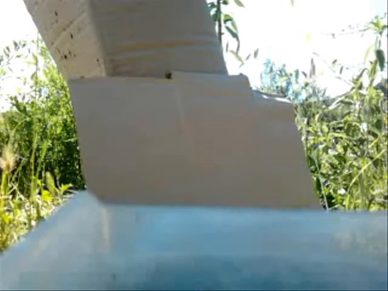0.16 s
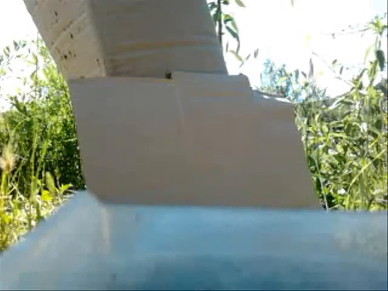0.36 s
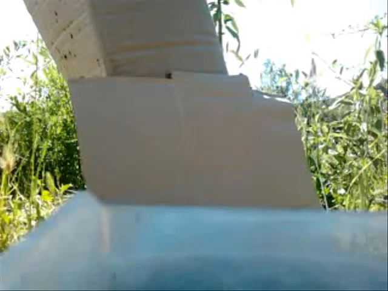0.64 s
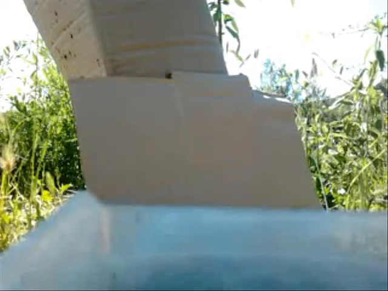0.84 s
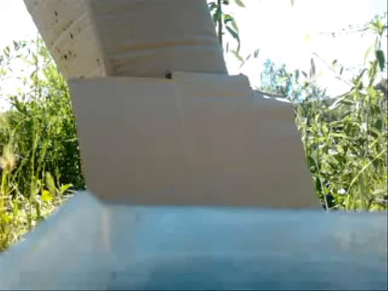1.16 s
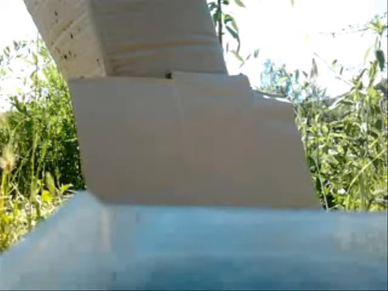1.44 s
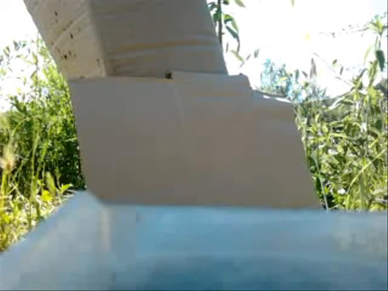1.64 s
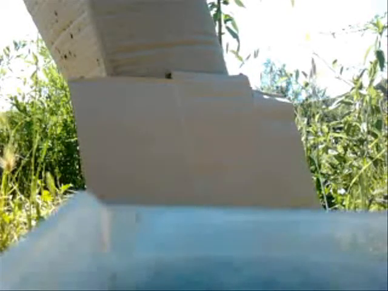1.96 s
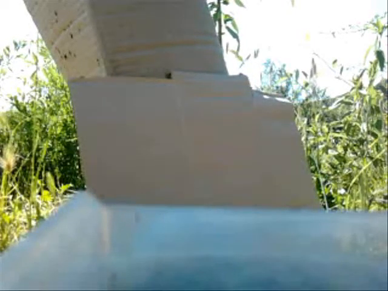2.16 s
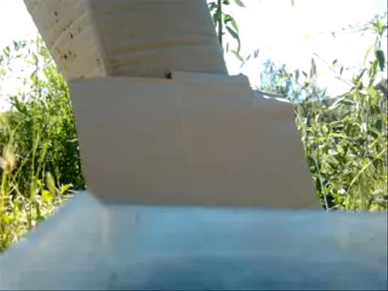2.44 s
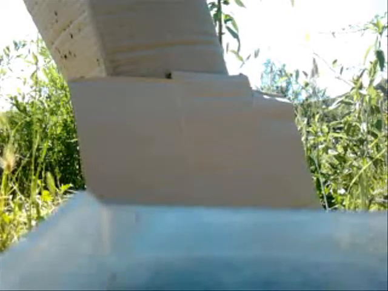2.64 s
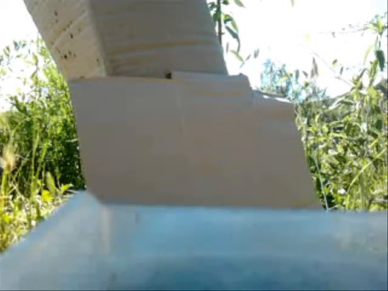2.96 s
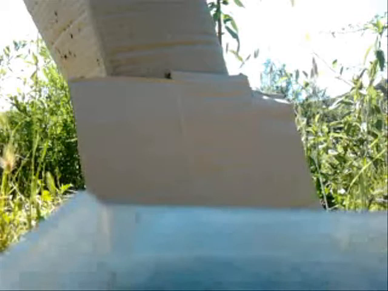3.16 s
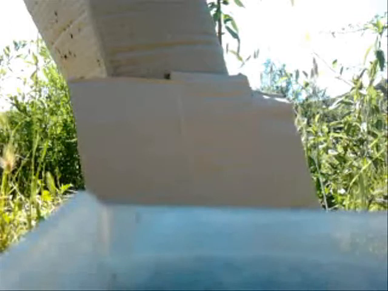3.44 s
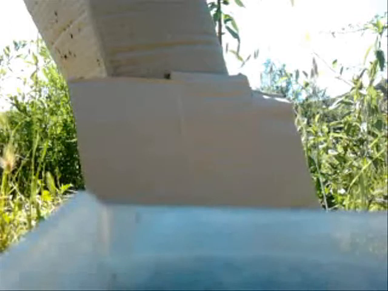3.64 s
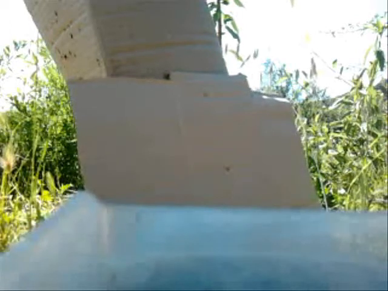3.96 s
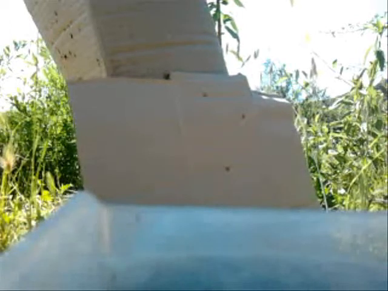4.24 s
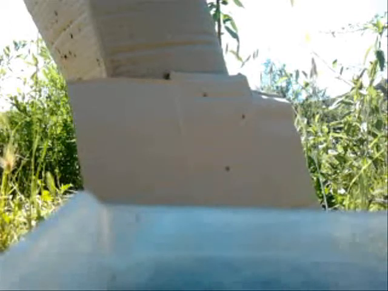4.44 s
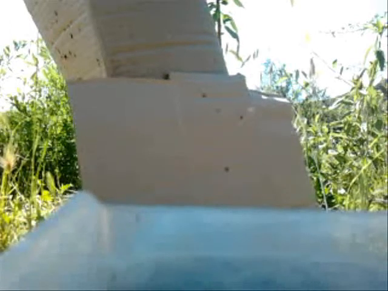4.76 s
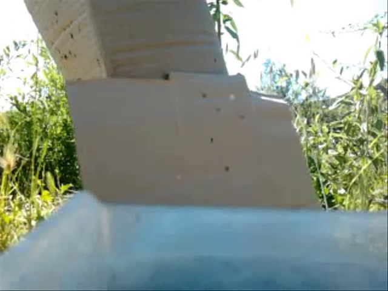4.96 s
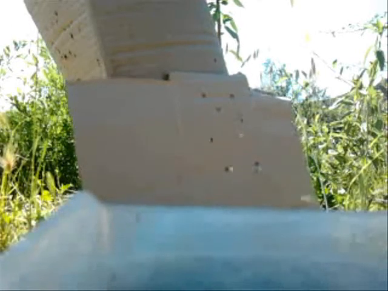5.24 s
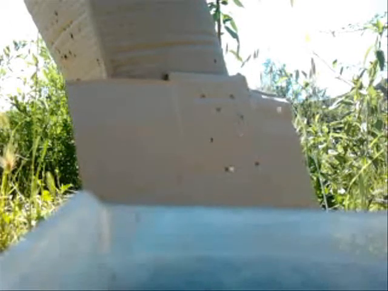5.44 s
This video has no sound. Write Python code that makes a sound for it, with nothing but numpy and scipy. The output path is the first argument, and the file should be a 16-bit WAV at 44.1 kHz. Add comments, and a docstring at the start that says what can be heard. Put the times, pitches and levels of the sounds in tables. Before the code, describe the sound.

Close microphone beside a cardboard target on a wooden stand, outdoors among plants. Small birds chirp for two seconds, then faint distant automatic pops begin. About a quarter second after most pops comes a loud, dry, woody crack. Single impacts turn into clusters, then a dense volley to the end, with glancing ticks, pattering pellets and short scattered echoes. Treble is muffled, and the loudest hits distort.

```python
"""Quiet open air, with a cardboard target on a wooden stand right beside the microphone; small birds chirp first.
Far off, an airsoft rifle fires short automatic bursts: faint pops of noise. Most are followed about a
quarter second later by the loud knock of a pellet, made of noise cracks and the ringing modes of the target;
the last knocks have no pop of their own. Bright ticks, mostly glancing pellets, and a soft patter surround
the knocks; a stray slaps a far panel. The recorder is dull above the mid treble and overloads on the knocks."""
import sys
import numpy as np
from scipy import signal
from scipy.io import wavfile
from scipy.ndimage import uniform_filter1d

SR = 44100
rng = np.random.default_rng(int(sys.argv[2]) if len(sys.argv) > 2 else 0)


def file_out(sig):
    """Save sig as 16-bit WAV at sys.argv[1]."""
    # one column per channel
    cols = np.atleast_2d(sig).T
    # limit, then scale
    lim = np.clip(cols, -1, 1)
    pcm = np.round(lim * 32767).astype(np.int16)
    wavfile.write(sys.argv[1], SR, pcm)


N = 246959  # samples, 5.6 s


def gain_of(db):
    """Decibels to amplitude."""
    return 10 ** (np.asarray(db) / 20)


def evened(x):
    """Scales to unit rms."""
    return x / np.sqrt(np.mean(x ** 2) + 1e-20)


def burst(x):
    """Scales a short sound to the energy of 10 ms at unit rms."""
    return x / np.sqrt(np.sum(x ** 2) / (SR / 100))


def read(points, hz):
    """Joins (Hz, value) points by straight lines on a log-frequency axis."""
    f, value = np.transpose(points)
    return np.interp(np.log(hz + 1), np.log(f + 1), value)


def add(mix, start_s, sound):
    """Mixes a sound in from a given time, cut off at the end of the mix."""
    part = mix[max(round(start_s * SR), 0):][:len(sound)]
    part += sound[:len(part)]


def noise(points, size, peak_hz=1000, peak_db=0, octaves=0.31):
    """Unit-rms noise of a given (Hz, dB) spectrum, with one optional resonance."""
    hz = np.fft.rfftfreq(size, 1 / SR)
    resonance_db = peak_db * np.exp(-(np.log2((hz + 1) / peak_hz) / octaves) ** 2)
    phases = np.exp(2j * np.pi * rng.random(len(hz)))
    return evened(np.fft.irfft(gain_of(read(points, hz) + resonance_db) * phases, size))


def blow(t, rise, t60):
    """An envelope that swells smoothly and then dies away, 60 dB in t60 seconds; top 1."""
    shape = (1 - np.exp(-(t / rise) ** 2)) * np.exp(-np.log(1000) * t / t60)
    return shape / shape.max(-1, keepdims=True)


def crackle(size, depth_db=4):
    """A grainy gain whose clumps are a millisecond or two long."""
    return gain_of(depth_db * evened(uniform_filter1d(rng.standard_normal(size), size=64)))


def tail(points, t60s):
    """One second of noise in which every band dies at its own speed; unit energy."""
    hz, t, bands = signal.stft(noise(points, SR), SR, nperseg=256)
    decay = np.exp(-np.log(1000) * t / read(t60s, hz)[:, None])
    x = signal.istft(bands * decay, SR, nperseg=256)[1][:SR]
    return x / np.linalg.norm(x)


# Spectrum of the open air. Each row: frequency in Hz, level in dB.
AIR_SPECTRUM = [(15, -43.5), (25, -23.5), (149, -15), (180, -4), (255, -2.5), (393, -5.5), (418, -6.5),
                (454, -5.5), (758, -9), (823, -9.5), (1030, -10.5), (2120, -15.5), (3400, -14), (4420, -44),
                (7480, -120)]


def air(murmur_db=-58, hiss_db=-68):
    """Steady outdoor murmur and a faint hiss of leaves, both shaped noise."""
    murmur = gain_of(murmur_db) * noise(AIR_SPECTRUM, N)
    hiss = gain_of(hiss_db) * noise([(1500, -31), (3400, 3.5), (4800, 4.0), (6500, -7.5)], N)
    return murmur + hiss


# Bird chirps. Each row: start in seconds, length in seconds, top pitch in Hz, level in dB.
CHIRP_CALLS = [(0.11, 0.09, 3480, -55), (0.641, 0.084, 3490, -48.5), (0.849, 0.053, 3240, -47),
               (1.072, 0.097, 3380, -49), (1.235, 0.038, 3600, -54), (1.279, 0.055, 3500, -55.5),
               (1.392, 0.052, 3550, -54.5), (1.515, 0.071, 3510, -53), (1.62, 0.062, 3460, -52.5),
               (2.074, 0.038, 3250, -44.5)]


def birds(climb_s=0.0224, climb_hz_per_s=13050, sag_hz_per_s=12000, quaver_hz=112):
    """Quavering whistles that climb to a top pitch, then sag: short ones arch, long ones fall away."""
    out = np.zeros(N)
    for start_s, length_s, top_hz, db in CHIRP_CALLS:
        size = int(length_s * SR)
        past_top = np.arange(size) / SR - climb_s
        glide = top_hz + np.minimum(climb_hz_per_s * past_top, -sag_hz_per_s * past_top)
        quaver = quaver_hz * evened(uniform_filter1d(rng.standard_normal(SR), size=150))[:size]
        whistle = np.sin(2 * np.pi * np.cumsum(glide + quaver) / SR)
        add(out, start_s, gain_of(db) * np.hanning(size) * whistle)
    return out


# What the surroundings of the target throw back. Each row: frequency in Hz, level in dB.
YARD_COLOUR = [(80, -0.5), (200, -7.5), (450, -11), (800, -9.5), (1400, -5.5), (2100, 7), (3200, -1.5),
               (4600, -9.5), (5400, -30), (7000, -46.5)]
# The same along the rifle's long path. Each row: frequency in Hz, level in dB.
FIELD_COLOUR = [(80, -11), (250, -4), (600, -1), (1200, -3), (1950, -6), (2600, 0), (3400, -1.5),
                (5000, -8.5)]
# How long scattered sound lasts. Each row: frequency in Hz, 60 dB decay in seconds.
YARD_DECAY = [(100, 0.57), (500, 0.26), (1500, 0.4), (2200, 0.3), (4000, 0.39)]


def yard(x, colour, build, count=3):
    """Plants and boards scatter sound back in a tail that builds up; the mix of paths drifts with time."""
    t, out = np.arange(SR) / SR, np.zeros(N)
    for k in range(count):
        # the squared shares of all paths always sum to 1
        share = np.cos(np.pi * (np.arange(N) / SR * 3.1 + k / count)) * np.sqrt(2 / count)
        clumps = gain_of(2.5 * evened(uniform_filter1d(rng.standard_normal(SR), size=250)))
        path = tail(colour, YARD_DECAY) * clumps * (1 - np.exp(-(t / build) ** 2))
        out += signal.fftconvolve(x * share, path)[:N]
    return out


# Far reports of the rifle. Each row: start in seconds, level in dB before the common offset.
RIFLE_SHOTS = [(2.238, -25), (2.963, -24.5), (3.07, -24), (3.75, -24), (3.849, -22.5), (3.934, -22.5),
               (4.495, -24), (4.599, -23), (4.682, -24)]
# Spectrum of a report. Each row: frequency in Hz, level in dB.
REPORT_SPECTRUM = [(50, -20.5), (130, -13.5), (190, 2.5), (330, -14), (530, 4.5), (720, -6), (1100, -11.5),
                   (1600, -9.5), (1930, 4), (2350, -11.5), (3200, -3.5), (5000, -24), (7000, -29)]


def shots(level_db=-9):
    """The distant piston pops its air out of the barrel: a short burst of shaped noise."""
    out, t = np.zeros(N), np.arange(SR // 8) / SR
    for start_s, db in RIFLE_SHOTS:
        pop = noise(REPORT_SPECTRUM, len(t)) * blow(t, 0.0042, 0.046)
        add(out, start_s, gain_of(db + level_db) * burst(pop))
    return out


# A stray pellet on a panel farther away. Each row: start in seconds, level in dB that all its parts share.
STRAY_SLAPS = [(2.403, -15)]
# Spectrum of the panel. Each row: frequency in Hz, level in dB.
PANEL_SPECTRUM = [(60, -7.5), (200, -10), (400, -4.5), (560, 9.5), (720, 3.5), (950, 4.5), (1300, -2.5),
                  (2200, 5.5), (3200, 6), (5000, -6), (7000, -19)]
# How long the panel's noisy ring lasts. Each row: frequency in Hz, 60 dB decay in seconds.
PANEL_DECAY = [(100, 0.39), (350, 0.86), (520, 0.59), (800, 0.43), (2000, 0.41), (4000, 0.38)]
# Tones of the panel. Each row: frequency in Hz, level in dB against the slap's row, 60 dB decay in seconds.
PANEL_TONES = [(397, -37.5, 0.38), (450, -26, 1.1), (537, -29.5, 1.4), (578, -26, 0.88), (998, -25.5, 0.42),
               (3530, -31, 0.61)]


def stray(slap_db=-9, ring_db=-5):
    """A slap on a far panel, with a long hollow ring of grainy noise and a few modes."""
    out, t = np.zeros(N), np.arange(SR) / SR
    for start_s, db in STRAY_SLAPS:
        slap = noise(PANEL_SPECTRUM, SR, 3150, 20, 0.11) * blow(t, 0.0042, 0.11)
        add(out, start_s, gain_of(db + slap_db) * burst(slap))
        ring = tail(PANEL_SPECTRUM, PANEL_DECAY) * crackle(SR, depth_db=2.0)
        add(out, start_s, gain_of(db + ring_db) * burst(ring))
        for hz, mode_db, t60 in PANEL_TONES:
            tone = np.sin(2 * np.pi * (hz * t + rng.random()))
            add(out, start_s, gain_of(db + mode_db) * blow(t, 0.0046, t60) * tone)
    return out


# Faint rustles near the target. Each row: start in seconds, length in seconds, centre in Hz, level in dB.
RUSTLE_PUFFS = [(3.211, 0.053, 1406, -50), (3.242, 0.025, 905, -48.5), (3.285, .02, 3050, -43.5),
                (3.292, 0.053, 1540, -47)]


def rustles():
    """Soft, brief puffs of noise, each round one centre frequency."""
    out = np.zeros(N)
    spectrum = [(100, -5.0), (600, -1.5), (4000, -8), (7000, -32.5)]  # (Hz, dB)
    for start_s, length_s, hz, db in RUSTLE_PUFFS:
        size = int(length_s * SR)
        puff = np.hanning(size) * noise(spectrum, size, hz, 11, 0.26)
        add(out, start_s, gain_of(db) * puff)
    return out


# What the target rings with, before scatter. Each row: frequency in Hz, level in dB, 60 dB decay in seconds.
BOARD_MODES = [(148, -10.5, 0.042), (206.3, -6, .11), (245.8, -2.5, 0.079), (304.6, -1.5, 0.092),
               (378, 1.5, 0.045), (438.8, -10.5, 0.072), (503, -3, 0.064), (572.5, -6.5, 0.065),
               (631.5, -1, 0.049), (693, -1, 0.054), (777.2, -4.5, 0.05), (882, -6.5, 0.036),
               (1013.5, -11, 0.044), (1159, -0.5, 0.043), (1344, -1.5, .035), (1432.5, 3.5, 0.027),
               (1625, -9.5, 0.048), (1840, -2.5, 0.048), (1970, -15, 0.013)]


def board(t, lo, hi, favoured_hz, rise, favour_db=8, scatter_db=3):
    """One group of the target's modes between lo and hi Hz; the spot that is struck favours some of them."""
    modes = np.array([mode for mode in BOARD_MODES if lo <= mode[0] < hi])
    hz, db, t60 = modes.T[:, :, None]
    favour = favour_db * np.exp(-(np.log2(hz / favoured_hz) / 0.16) ** 2)
    db = db + scatter_db * rng.standard_normal(hz.shape) + favour
    detuned_hz = hz * (1 + .025 * rng.standard_normal(hz.shape))
    turns = detuned_hz * t + rng.random(hz.shape)
    return burst(np.sum(gain_of(db) * blow(t, rise, t60) * np.sin(2 * np.pi * turns), 0))


def part_gain(law, force_db, firm_db):
    """Gain of one part of a hit, from the pellet's force and the firmness of the spot."""
    level_db, per_force, per_firmness = law
    return gain_of(level_db + per_force * force_db + per_firmness * firm_db)


# Pellets on the target. Each row: start in seconds, force in dB, firmness of the struck spot in dB,
# thud and knock pitch that the spot favours in Hz, level of the first tear in the card in dB.
TARGET_HITS = [(3.336, -3, 4.5, 225, 496, -26.5), (4.034, -1.5, -3, 328, 790, -32),
               (4.105, 0.5, -3, 301, 595, -12.5), (4.195, 2.5, -1.4, 390, 624, -21.5),
               (4.762, -1, 2.5, 363, 768, -15.5), (4.861, 0, 1.2, 268, 460, -11),
               (4.9657, 0.9, -4.5, 385, 640, -17.5), (5.035, 0, -2, 361, 597, -15.5),
               (5.124, 1, 0, 421, 451, -40), (5.18, 1, 1, 304, 730, -30), (5.275, 0, 1.5, 226, 567, -28),
               (5.359, 0, -1, 279, 756, -16.5), (5.421, 0.47, 2, 361, 835, -10),
               (5.53, -0.5, 0.5, 332, 458, -20)]
# The pellet's crack. Each row: frequency in Hz, level in dB.
SNAP_SPECTRUM = [(60, -11), (300, -5.5), (1000, 2.5), (2000, 0), (2800, 1), (3600, 0), (4700, -8.5),
                 (6000, -18.5), (9000, -32.5)]
# Splintering fibres. Each row: frequency in Hz, level in dB.
FIZZ_SPECTRUM = [(3000, -50), (5300, -9.5), (6500, 6), (9000, 3.5), (15000, 4)]
# How each part of a hit follows the pellet: a firm spot knocks and clacks, a slack one mostly thuds.
# Each law: level in dB, dB per dB of force, dB per dB of firmness.
THUD_BY_FORCE = (-11, 1.1, -0.091)
KNOCK_BY_FORCE = (-6, 0.7, 0.89)
CLACK_BY_FORCE = (-13, 3.1, 2.64)
SNAP_BY_FORCE = (-11.5, 1.1, .05)
FIZZ_BY_FORCE = (-8.5, 6.5, 3.6)


def hits(clack_hz=1410, lead_s=.0035, slap_db=-7, crumple_db=-14, push_db=-16):
    """A pellet tears into the card, cracks on the backing and sets the board ringing."""
    out, t = np.zeros(N), np.arange(SR // 6) / SR
    size = len(t)
    push_spectrum = [(20, -27.5), (80, 0.0), (160, 11), (400, -20), (1000, -69.5)]  # (Hz, dB)
    for start_s, force, firm, thud_hz, knock_hz, tear_db in TARGET_HITS:
        thud = part_gain(THUD_BY_FORCE, force, firm)
        knock = part_gain(KNOCK_BY_FORCE, force, firm)
        clack = part_gain(CLACK_BY_FORCE, force, firm)
        snap = part_gain(SNAP_BY_FORCE, force, firm)
        fizz = part_gain(FIZZ_BY_FORCE, force, firm)

        # the card gives a soft tick just before the backing is struck
        tick = noise(SNAP_SPECTRUM, size, clack_hz, 10) * blow(t, .001, .018)
        add(out, start_s - lead_s, gain_of(tear_db) * burst(tick))
        slap = noise(SNAP_SPECTRUM, size, clack_hz, 31, 0.67) * blow(t, 0.00059, 0.047)
        add(out, start_s, clack * gain_of(slap_db) * burst(slap))
        crack = noise(SNAP_SPECTRUM, size) * blow(t, 0.00033, 0.055)
        add(out, start_s, snap * burst(crack))

        # torn fibres crackle on for a moment, and splinter for longer on a firm spot
        crumple = noise(SNAP_SPECTRUM, size) * crackle(size) * blow(t, 0.0036, 0.1)
        add(out, start_s, snap * gain_of(crumple_db) * burst(crumple))
        fizz_t60 = 0.032 * gain_of(2.5 * max(firm, 0))  # seconds
        splinter = noise(FIZZ_SPECTRUM, size) * crackle(size) * blow(t, 0.0034, fizz_t60)
        add(out, start_s, fizz * burst(splinter))

        # low bending waves travel slowly, so the lower groups of modes swell later
        add(out, start_s, clack * board(t, 1100, np.inf, clack_hz, rise=0.0015))
        add(out, start_s, knock * board(t, 420, 1100, knock_hz, rise=0.0061))
        add(out, start_s, thud * board(t, 0, 420, thud_hz, rise=0.0083))

        # the whole sheet gives way and pushes the air
        push = noise(push_spectrum, size) * blow(t, 0.0036, 0.027)
        add(out, start_s, thud * gain_of(push_db) * burst(push))
    return out


# Single echoes from things near the target. Each row: delay in seconds, level in dB before the mix,
# centre in Hz, relative bandwidth (no unit), 60 dB decay of the smear in seconds.
NEAR_ECHOES = [(.039, -16, 2200, 0.38, 0.022), (0.093, -18.5, 2270, 0.26, 0.0078),
               (.146, -36, 350, .8, .008)]


def echoes(x):
    """Each nearby surface sends back one band of the sound, slightly smeared."""
    out, t = np.zeros(N), np.arange(SR // 20) / SR
    for delay_s, db, hz, width, smear_s in NEAR_ECHOES:
        band = noise([(20, 0), (20000, 0)], len(t), hz, 60, 2.5 * width)
        path = band * blow(t, .006, smear_s)
        path = path / abs(np.fft.rfft(path)).max()  # strongest frequency passes at unit gain
        add(out, delay_s, gain_of(db) * signal.fftconvolve(x, path))
    return out


# Hard, bright spectrum of the patter and the ticks. Each row: frequency in Hz, level in dB.
TICK_SPECTRUM = [(80, -26.5), (400, -15.5), (1050, -14), (1480, 0.5), (1720, -6), (2050, 3.5), (2350, -5.5),
                 (3100, 1.5), (3600, -9.5), (4700, -10.5), (7000, -28.5)]


def rattle(level_db=-29, fall_db_per_s=130, count=12):
    """Spent pellets patter through the plants after each hit: random ticks, softer the later they come."""
    out, t = np.zeros(N), np.arange(SR // 20) / SR
    patter = blow(t, .007, .035)
    for start_s, *_ in TARGET_HITS:
        for delay_s, hz in rng.uniform([.03, 1400], [.17, 3000], (count, 2)):
            tick = burst(noise(TICK_SPECTRUM, len(t), hz, 7.8, 0.18) * patter)
            add(out, start_s + delay_s, gain_of(level_db - fall_db_per_s * delay_s) * tick)
    return out


# Short bright ticks around the target: mostly glancing pellets; the one at 4.289 is an echo of the knock
# before it. Each row: start in seconds, level in dB that tick and dull part share, ring in Hz, further level
# of the dull part in dB; common offsets follow.
BRIGHT_TICKS = [(3.402, -23, 1096, -2), (4.157, -11, 1440, -13.5), (4.289, -21, 2300, -25),
                (4.374, 1.5, 3420, -32.5), (5.388, -5, 2740, -13), (5.586, -10.5, 993, -3)]


def bright_ticks(level_db=-11, dull_offset_db=-5):
    """Short bursts of noise round one ring frequency, each with a dull part of its own strength."""
    out, t = np.zeros(N), np.arange(SR // 20) / SR
    dull_spectrum = [(50, -13), (300, 3.0), (900, 9.0), (2000, -36.0), (5000, -47.5)]  # (Hz, dB)
    for start_s, db, hz, dull_db in BRIGHT_TICKS:
        tick = noise(TICK_SPECTRUM, len(t), hz, 12.6, 0.39) * blow(t, 0.0027, 0.0093)
        add(out, start_s, gain_of(db + level_db) * burst(tick))
        dull = noise(dull_spectrum, len(t)) * blow(t, 0.0054, 0.024)
        add(out, start_s, gain_of(db + dull_db + dull_offset_db) * burst(dull))
    return out


def scene():
    """Near blows are mostly dry; the far rifle and birds come with more echo."""
    near, ticks, far, song = hits(), bright_ticks(), shots(), birds()
    near_scatter = yard(gain_of(-18.0) * near + gain_of(-39.5) * ticks, YARD_COLOUR, build=0.032)
    near_echo = near_scatter + gain_of(6.5) * echoes(near)
    far_echo = yard(gain_of(-3) * far + gain_of(-8.5) * song, FIELD_COLOUR, build=0.053)
    sources = near + ticks + far + song + rattle() + rustles() + stray() + air()
    return (sources + near_echo + far_echo)[None]


# Response of the microphone. Each row: frequency in Hz, gain in dB.
MICROPHONE_RESPONSE = [(15, -14), (55, -1.5), (3400, -1.5), (3800, -9.5), (4200, -13), (4750, -10),
                       (5200, -49), (7000, -35), (10500, -38), (15000, -53)]


def record(dry, knee=9, hiss_db=-100, edge_hz=15700):
    """A dull microphone, then overload that puts treble back on the loudest knocks, then the band limit."""
    hz = abs(np.fft.fftfreq(4096, 1 / SR))
    log_gain = np.log(gain_of(read(MICROPHONE_RESPONSE, hz)))
    # minimum phase, so that nothing sounds ahead of a knock
    taps = np.fft.ifft(np.exp(np.conj(signal.hilbert(log_gain)))).real[:1024]
    dull = signal.oaconvolve(dry, taps[None])[:, :N]
    clipped = dull / (1 + abs(dull) ** knee) ** (1 / knee)
    hissing = clipped + gain_of(hiss_db) * rng.standard_normal(N)
    band_limit = signal.firwin(255, edge_hz, window=("kaiser", 8), fs=SR)
    return signal.oaconvolve(hissing, band_limit[None], "same")


dry = scene()
out = record(dry)
file_out(out)
```